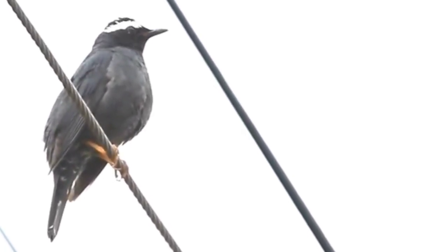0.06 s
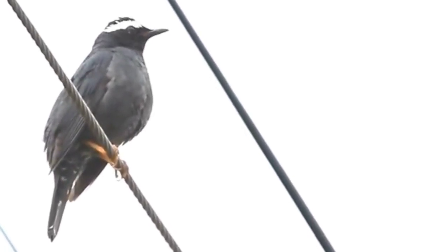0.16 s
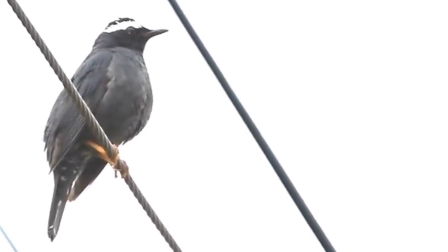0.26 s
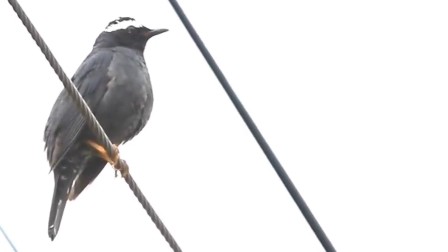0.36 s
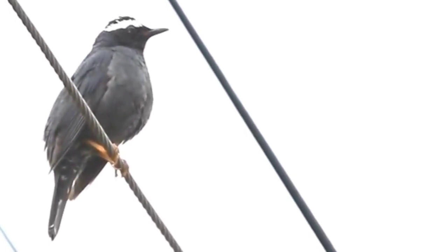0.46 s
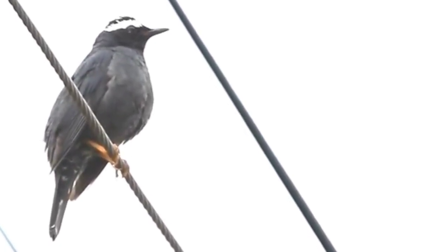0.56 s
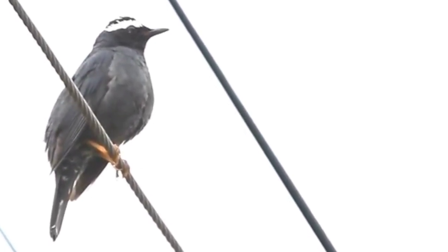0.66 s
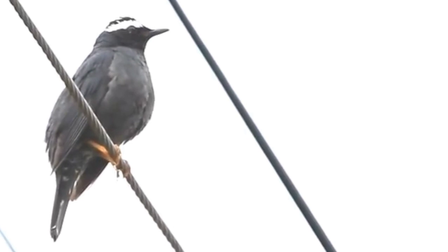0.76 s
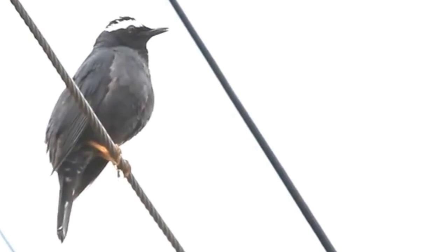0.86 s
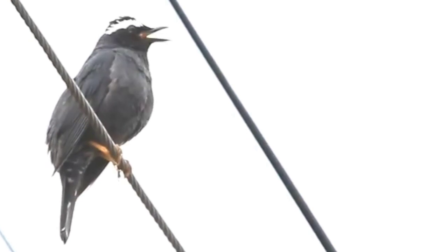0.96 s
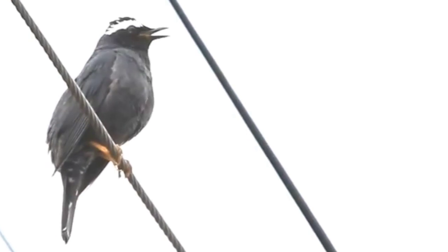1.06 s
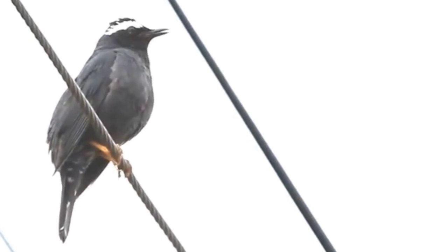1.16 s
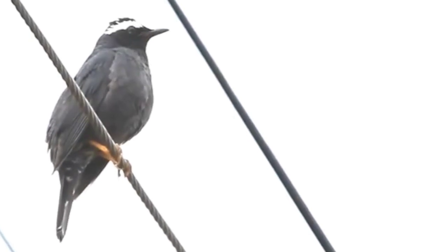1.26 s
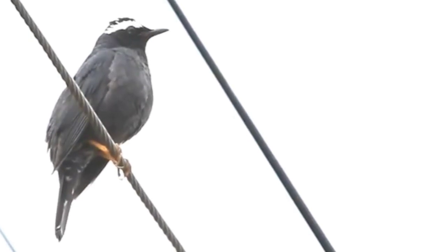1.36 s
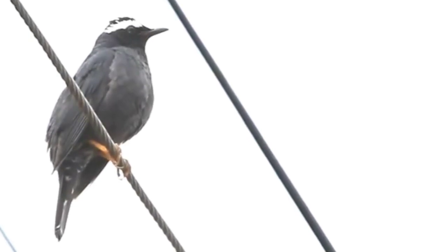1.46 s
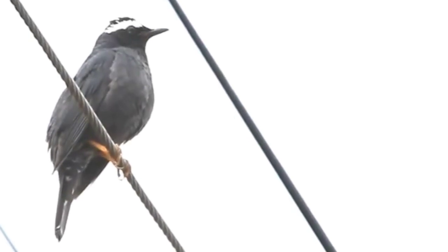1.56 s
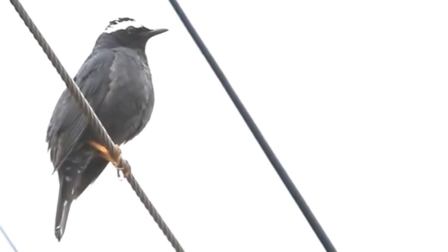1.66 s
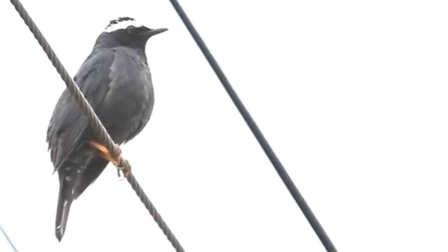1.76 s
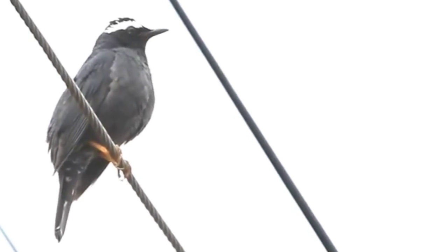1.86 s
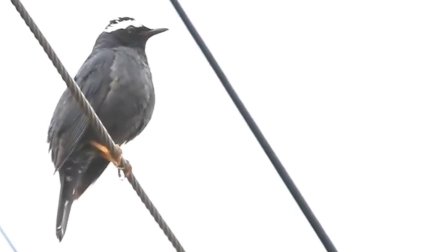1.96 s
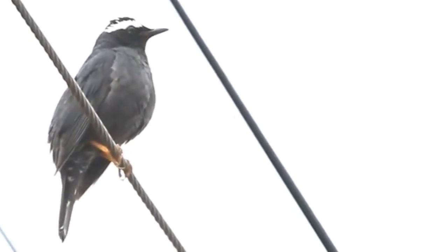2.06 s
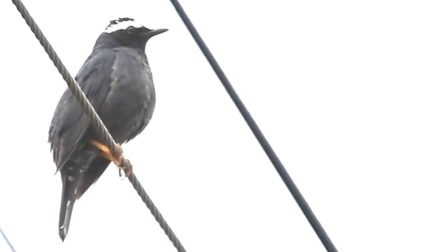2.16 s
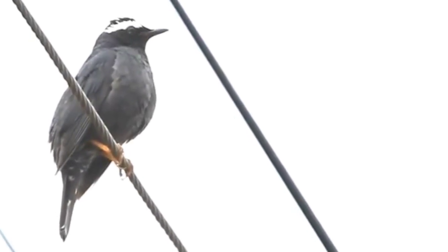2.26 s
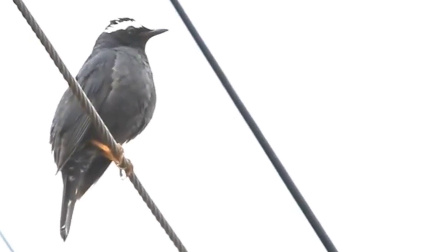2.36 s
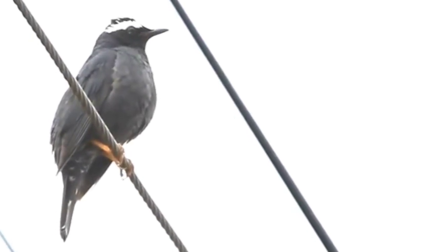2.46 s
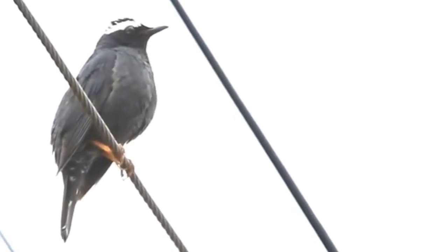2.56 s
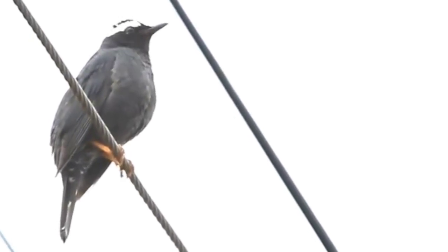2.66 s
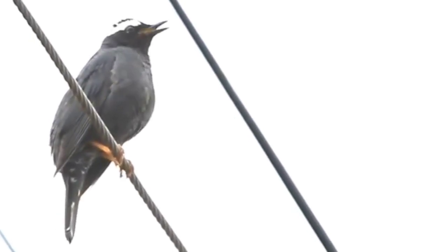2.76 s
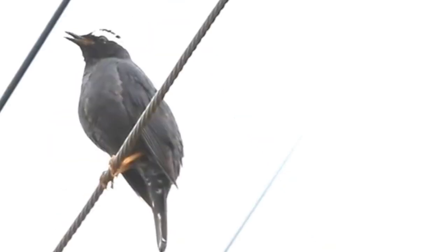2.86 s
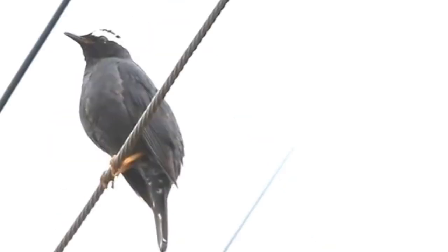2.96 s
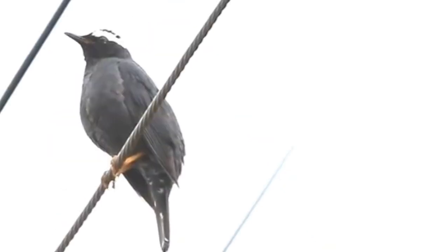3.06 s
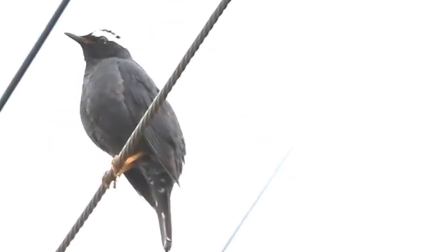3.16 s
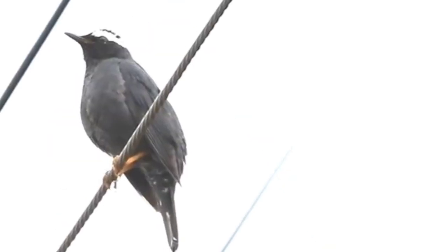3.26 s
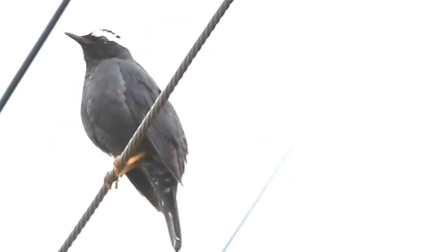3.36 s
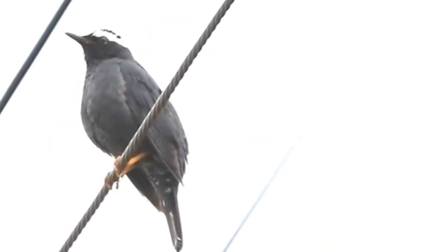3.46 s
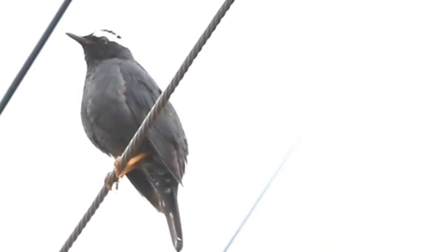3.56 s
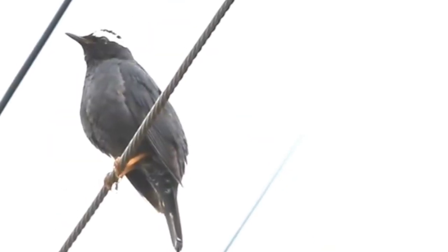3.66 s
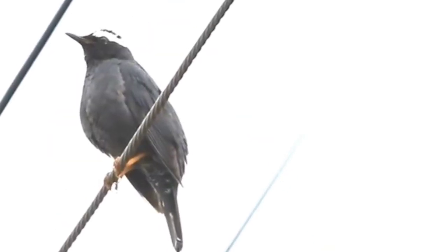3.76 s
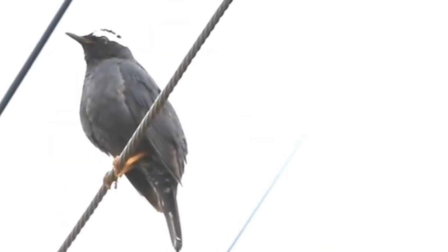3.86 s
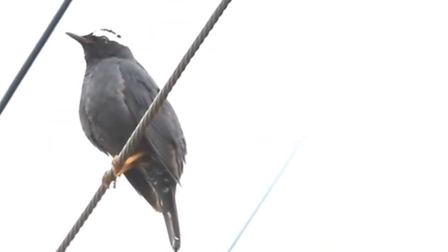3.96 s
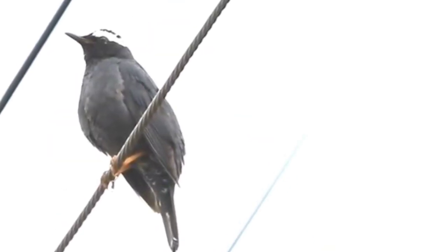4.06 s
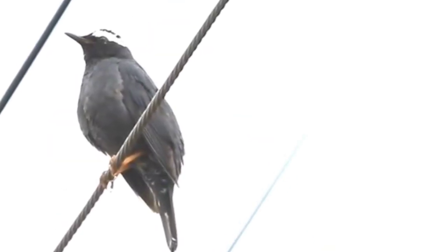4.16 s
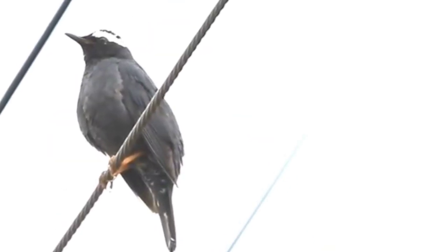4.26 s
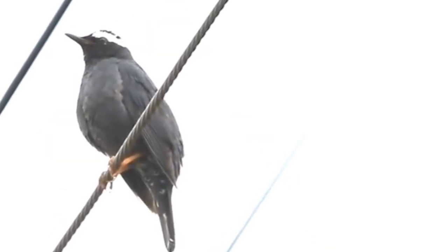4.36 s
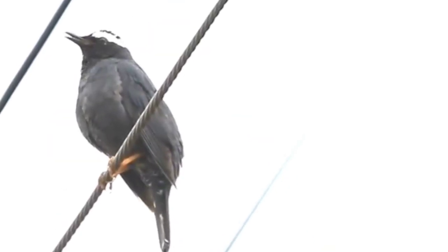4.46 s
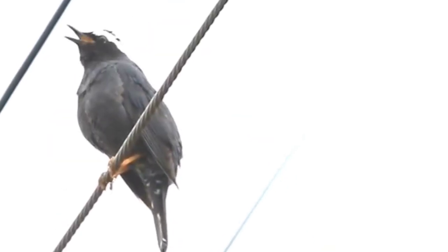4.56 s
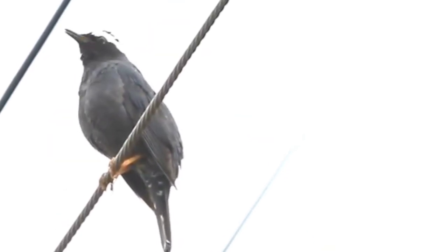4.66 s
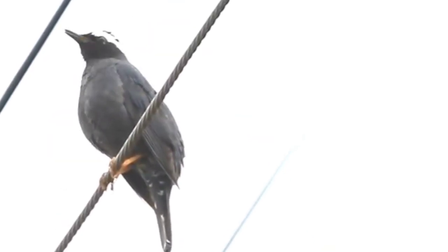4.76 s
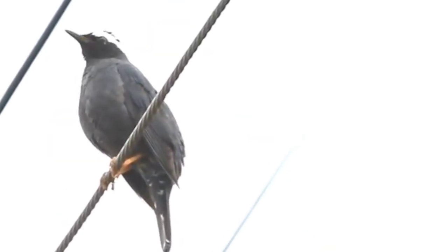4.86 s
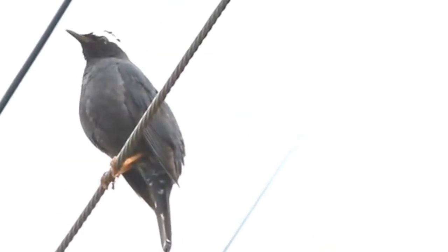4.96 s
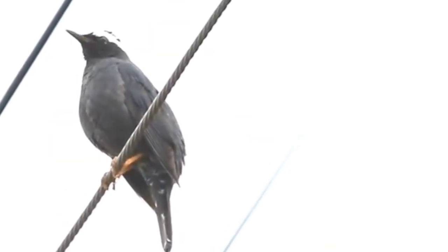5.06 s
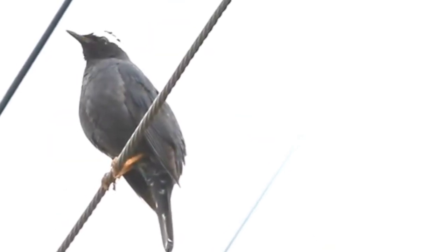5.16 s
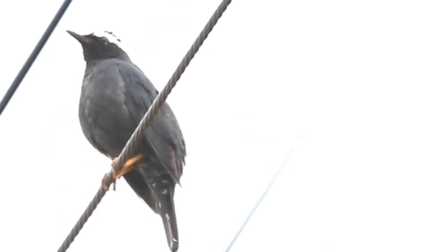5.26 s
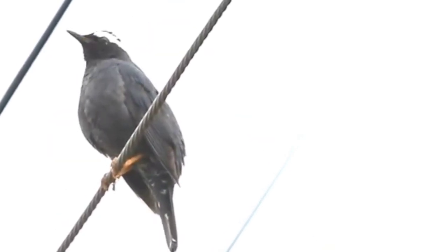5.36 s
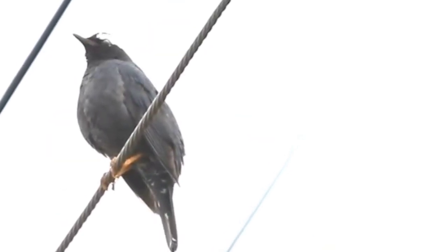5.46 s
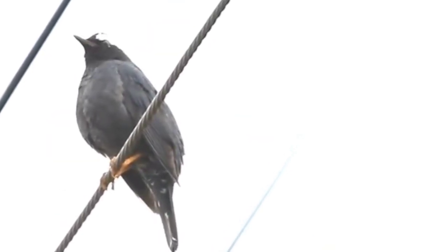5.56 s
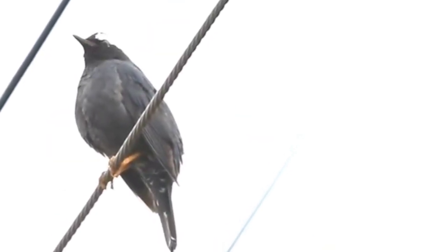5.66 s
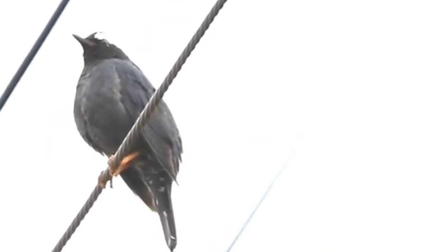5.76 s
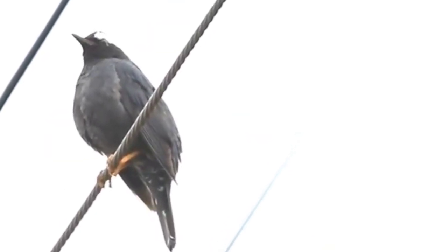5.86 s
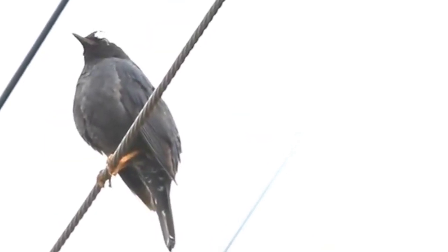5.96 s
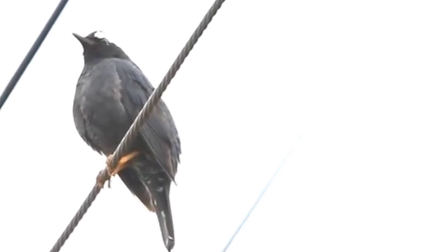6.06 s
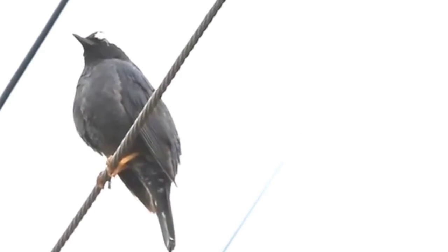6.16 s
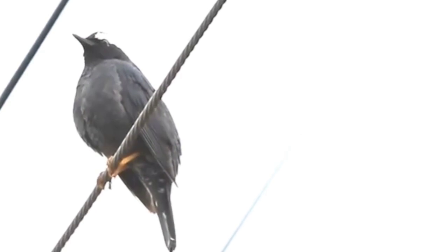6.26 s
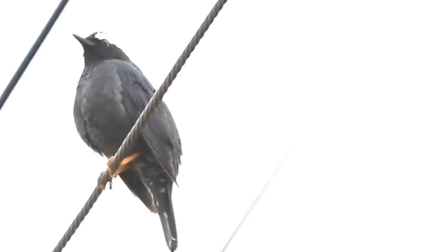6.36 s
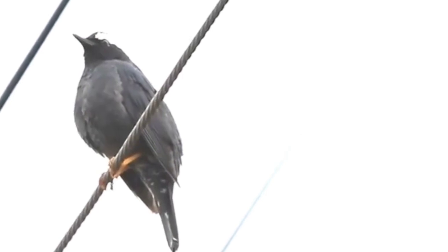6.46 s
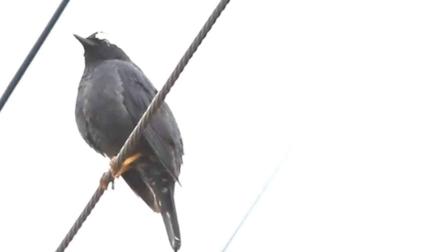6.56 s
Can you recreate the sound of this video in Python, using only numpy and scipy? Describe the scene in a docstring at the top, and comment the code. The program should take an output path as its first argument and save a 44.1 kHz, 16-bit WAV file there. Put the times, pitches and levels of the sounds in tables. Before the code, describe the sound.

Faint hum and hiss with two low distant whistles open the scene. Then a nearby thrush gives a strong fluty phrase, a few thin high notes, a fast fading trill, and finally a fluty sweep ending in squeaks and buzz. Far birds answer in the gaps, and a small one repeats thin calls to the end. Open wooded place, nearly mono sound.

```python
"""A faint hollow hum and hiss come first, then far birds; soon a thrush on a wire sings close by.
The thrush mixes fluty warbles, thin high notes and a trill, while other birds call from the trees around.
Every bird note is a sine wave that glides in pitch and is thrown back by the trees as echoes.
The hum and hiss are random noise, made stronger at some pitches than at others."""
import sys
import numpy as np
from scipy import signal
from scipy.fft import rfft, irfft
from scipy.io import wavfile
from scipy.ndimage import uniform_filter1d

SR = 44100
rng = np.random.default_rng(int(sys.argv[2]) if len(sys.argv) > 2 else 0)


def unload_wav(signal):
    """Save mono or channel-first audio to the path in sys.argv[1] as 16-bit WAV at rate SR, clipped to [-1, 1]."""
    wavfile.write(
        sys.argv[1],
        SR,
        np.round(np.clip(np.atleast_2d(signal).T, -1, 1) * 32767).astype(np.int16),
    )


N = 291942


def gain_of(db):
    """Turns decibels into a factor on the sound wave."""
    return 10 ** (np.asarray(db) / 20)


def evened(x):
    """Scales a signal to an average strength (rms) of 1."""
    return x / np.sqrt(np.mean(x ** 2) + 1e-20)


def read(points, hz):
    """Reads a (pitch_hz, value) table at any pitch, along a logarithmic pitch scale."""
    table_hz, value = np.transpose(points)
    return np.interp(np.log(hz + 1), np.log(table_hz + 1), value)


def add(mix, start_s, sound):
    """Adds a sound into the mix at its start time, cut off at the end of the mix."""
    part = mix[round(start_s * SR):][:len(sound)]
    part += sound[:len(part)]


def wander(length, ms):
    """Smooth chance of rms 1 that changes within about ms."""
    span = max(round(ms * SR / 1000), 2)
    smooth = uniform_filter1d(rng.standard_normal(length), span)
    return evened(uniform_filter1d(smooth, span))


# Hollow resonances in the background: (pitch_hz, width_hz, relative_db)
HUM_RESONANCES = [(59.07, 16, -3.5), (129.4, 35, -11.5), (367.06, 87, -2.5), (637.9, 62, -2),
                  (796.4, 61, 1), (1361, 79, -7), (2683.6, 270, -17.5), (3550, 100, -23)]
# The resonance near 237 Hz changes in strength: (time_s, relative_db)
LOW_HUM_LEVEL = [(0, 0.5), (.5, 5.5), (.9, -3), (3.3, 0.5), (4.0, -7), (6.62, -5.5)]
LOW_HUM_HZ, LOW_HUM_WIDTH_HZ = 237.1, 72


def hum_power(hz, time_s):
    """Hollow hum: power is lifted in a peak around each resonance."""
    low_db = np.interp(time_s, *np.transpose(LOW_HUM_LEVEL))
    resonances = HUM_RESONANCES + [(LOW_HUM_HZ, LOW_HUM_WIDTH_HZ, low_db)]
    return sum(gain_of(2 * db) / (1 + (2 * (hz - centre_hz) / width_hz) ** 2) ** 2
               for centre_hz, width_hz, db in resonances)


# Tone colour of the hiss, before an even lowering: (pitch_hz, relative_db)
HISS_COLOUR = [(20, -31.5), (50, -16.5), (120, -13.5), (250, -9.5), (500, -4.5), (900, -8), (1500, -11.5),
               (2200, -25.5), (3100, -23), (6000, -28), (13200, -36), (14000, -53.5), (15700, -54)]
# Left-right difference (side) against the shared sound (mid), also used by the echoes: (pitch_hz, side_db)
STEREO_WIDTH = [(100, -38.5), (400, -46), (2500, -32), (5000, -24), (10000, -22), (14000, -21.5)]
# Overall background level, before its slow unevenness: (time_s, level_db)
BACKGROUND_LEVEL = [(0.0, -65), (4.6, -65.5), (4.85, -61.5), (5.2, -65), (6.62, -66.5)]
# The background level dips briefly: (centre_s, half_length_s, change_db)
BACKGROUND_DIPS = [(2.53, 0.068, -5), (2.84, 0.0134, -13)]
SWELL_DB, SWELL_MS = 1.3768, 120  # slow unevenness


def background():
    """Noise with a coloured spectrum, lifted at the hum's resonances, in slowly drifting patches."""
    frames, hz = N // 512 + 5, np.fft.rfftfreq(2048, 1 / SR)[:, None]
    a, b, c, d, patches = rng.standard_normal((frames, 1025, 5)).T
    patches = evened(uniform_filter1d(uniform_filter1d(patches, 14, 0), 8, 1))
    hiss = gain_of(2 * read(HISS_COLOUR, hz) - 8.0)  # doubled decibels give power
    power = hiss + hum_power(hz, np.arange(frames) * 512 / SR)
    colour = np.sqrt(power) * gain_of(0.54 * patches)
    side_noise = (c + 1j * d) * gain_of(read(STEREO_WIDTH, hz))
    z = np.array([a + 1j * b, side_noise]) * colour
    mid, side = signal.istft(z, nperseg=2048, noverlap=1536)[1][:, :N]
    t = np.arange(N) / SR
    level_db = np.interp(t, *np.transpose(BACKGROUND_LEVEL)) + SWELL_DB * wander(N, SWELL_MS)
    for centre_s, half_s, change_db in BACKGROUND_DIPS:
        level_db = level_db + change_db * np.exp(-((t - centre_s) / half_s) ** 2)
    return gain_of(level_db) * evened(np.array([mid + side, mid - side]))


# Basic time to die by 60 dB, before each echo's own speed and thinning: (pitch_hz, time_s)
ECHO_TIMES = [(1600, 0.36), (2000, 0.7), (2400, 0.7945), (2700, 0.32), (3000, 0.44), (3600, 0.53),
              (4500, 0.53), (6000, 0.65), (7300, 0.42), (9000, 0.43), (12000, 0.15)]
# Pitches the trees return more or less strongly: (pitch_hz, change_db)
ECHO_COLOUR = [(1500, 6), (2000, -4.5), (2400, -2), (2700, 2), (3000, 1), (4000, -2), (6000, -1),
               (9000, -0.5)]
# Clumps of trees answer more strongly or weakly: (delay_s, change_db)
THICKETS = [(.03, 2.5), (.058, -5.5), (.105, 2.5), (.16, -2)]


def echoes(x, delay_s, quicker, thinning_db, patchy_db):
    """Sparse taps from trunks and leaves, uneven in time and pitch; each band dies at its own speed, ever faster."""
    taps = np.zeros((2, SR))
    at = np.arange(round(delay_s * SR), SR - 80, 60)
    at = at + rng.integers(0, 60, (2, len(at)))
    np.put_along_axis(taps, at, rng.standard_normal(at.shape), 1)
    hz, t, z = signal.stft(taps, SR, nperseg=256)
    patches = rng.standard_normal(z.shape[1:])
    patches = evened(uniform_filter1d(uniform_filter1d(patches, size=3, axis=0), size=6, axis=1))
    fade = quicker * t / read(ECHO_TIMES, hz)[:, None]
    clumps_db = sum(db * np.exp(-((t - s) / 0.003) ** 2) for s, db in THICKETS)
    thinning = np.minimum(thinning_db * fade ** 2, 200)
    db = -60 * fade - thinning + clumps_db + patchy_db * patches
    z = z * gain_of(db + read(ECHO_COLOUR, hz)[:, None])
    z[1] *= gain_of(read(STEREO_WIDTH, hz) + 3.5)[:, None]  # wider than the background
    mid, side = signal.istft(z, SR, nperseg=256)[1]
    left_right = np.array([mid + side, mid - side]) / np.linalg.norm(mid)
    return signal.fftconvolve(x[None], left_right, axes=1)[:, :N]


OCTAVE_HZ, OCTAVE_WIDTH_HZ, OCTAVE_DB = 4900, 197, -42  # a throat resonance


def whistle(hz, db, waver, flutter_db, octave=False):
    """A sine from the syrinx, unsteady in pitch and strength; an octave sounds only near the throat resonance."""
    turns = 2 * np.pi * np.cumsum(hz * (1 + waver * wander(len(hz), 2.56))) / SR
    tone = np.sin(turns)
    if octave:
        resonance = 1 / (1 + (2 * (2 * hz - OCTAVE_HZ) / OCTAVE_WIDTH_HZ) ** 4)
        tone = tone + gain_of(OCTAVE_DB) * np.sin(2 * turns) * resonance
    strength = gain_of(db + flutter_db * wander(len(hz), 3.5))
    soft_ends = signal.windows.tukey(len(hz), min(1, .012 * SR / len(hz)))
    return np.sqrt(2) * strength * tone * soft_ends


def notes(tables, waver, flutter_db, octave=False):
    """Plays each (time_s, pitch_hz, level_db) curve as one whistle with rounded corners."""
    out = np.zeros(N)
    for rows in tables:
        s, hz, db = np.transpose(rows)
        t = np.arange(s[0], s[-1], 1 / SR)
        hz = uniform_filter1d(np.interp(t, s, hz), size=130)
        db = uniform_filter1d(np.interp(t, s, db), size=130)
        add(out, s[0], whistle(hz, db, waver, flutter_db, octave))
    return out


EDGE_CURVE = 1.7  # above 1 the note lingers near its peak


def shaped(rows, swell_db, fade_db):
    """Makes note curves that swell to a peak and fade while the pitch glides through three values."""
    u, tables = np.linspace(0, 1, num=25), []
    for start_s, length_s, place, first_hz, peak_hz, last_hz, peak_db in rows:
        place = np.clip(place, .05, .95)
        rise = np.maximum(1 - u / place, 0)
        fall = np.maximum((u - place) / (1 - place), 0)
        db = peak_db - swell_db * rise ** EDGE_CURVE - fade_db * fall ** EDGE_CURVE
        hz = np.interp(u, [0, place, 1], [first_hz, peak_hz, last_hz])
        tables.append(np.transpose([start_s + length_s * u, hz, db]))
    return tables


def warble(rows, per_s, start, narrow, dip_db, slide_db, flutter_db, slowing=0):
    """A whistle whose pitch dips once a cycle; narrow makes dips briefer, dip_db louder; slide_db weakens slides."""
    s, *columns = np.transpose(rows)
    t = np.arange(s[0], s[-1], 1 / SR)
    top_hz, dip_hz, db = (np.interp(t, s, c) for c in columns)
    since = t - s[0]
    cycles = start + since * per_s - slowing * since ** 2 / 2
    dip = abs(np.cos(np.pi * cycles)) ** narrow  # 0 at the top pitch, 1 at the lowest
    level_db = db + dip_db * dip - slide_db * dip * (1 - dip)
    out = np.zeros(N)
    add(out, s[0], whistle(top_hz - dip_hz * dip, level_db, .004, flutter_db))
    return out


# Single notes of birds farther off: (start_s, length_s, peak_place 0-1, first_hz, peak_hz, last_hz, peak_db)
DISTANT_NOTES = [(.283, 0.0837, .3, 2130, 2000, 1937, -47.5), (.35, 0.0973, .35, 2100, 2054, 1928, -50.5),
                 (1.832, 0.0708, 0.233, 2482, 2393, 2300, -63), (3.41, 0.096, .5, 8090, 8520, 8520, -81),
                 (3.578, 0.1, 0.22, 4466, 4472, 4553, -43), (3.7, 0.23, 0.41, 4504, 4560, 4600, -57),
                 (3.625, 0.045, 0.33, 3724, 3840, 3645, -55.5),
                 (3.698, 0.0196, 0.44, 7000, 6930, 6950, -54), (3.718, 0.0244, .3, 6550, 6516, 6430, -58.5),
                 (3.742, 0.0517, 0.41, 3259, 3230, 3610, -46), (3.785, 0.196, 0.64, 3585, 3783, 3820, -48),
                 (3.81, 0.173, 0.3, 4690, 4830, 4830, -54.5), (4.048, 0.063, .45, 6540, 6076, 5790, -44),
                 (4.19, 0.0488, 0.33, 6470, 6290, 5870, -42.5), (4.305, 0.16, .3, 7600, 7730, 7730, -68.5),
                 (4.428, 0.034, .55, 3900, 3403, 3363, -49), (4.45, 0.187, .45, 3284, 3251, 3297, -48),
                 (6.435, .065, 0.281, 5004, 5015, 4950, -67)]


def distant_notes():
    """Far birds give single gliding whistles."""
    return notes(shaped(DISTANT_NOTES, swell_db=15, fade_db=9.84), 0.0035, 3.3)


def repeats(shape, times):
    """The same call at each time, with the pitch scaled and the level shifted."""
    return [[(s + at, hz * pitch, db + level) for s, hz, db in shape] for at, level, pitch in times]


# Shapes of a small distant bird's two calls, before scaling: (from_start_s, pitch_hz, relative_db)
RISING_SHAPE = [(0, 3451, -24.5), (.016, 3578.5, -2.5), (.03, 3849.5, -11), (.047, 4268, 0.5),
                (.095, 4240.5, -12)]
FALLING_SHAPE = [(0, 6930, -32.5), (.014, 7273, -9), (.023, 7476, -4), (.031, 6711, 1), (.055, 7150, -1.5),
                 (.075, 7089, -18)]
# When each call comes: (start_s, level_db, pitch_factor)
RISING_TIMES = [(1.641, -73, 0.992), (1.99, -75, 0.957), (2.34, -70.5, 0.97), (4.45, -66.5, 0.998),
                (5.135, -50, 0.99), (5.484, -53.5, 1), (5.835, -58, 0.974), (6.184, -50, 1.0),
                (6.531, -51, 0.956)]
FALLING_TIMES = [(2.157, -74.5, 0.973), (2.506, -54.5, 0.963), (5.3, -51, 0.991), (5.655, -53.5, 0.9978),
                 (5.997, -51.5, 1.0), (6.348, -49, 0.9965)]


def two_call_bird():
    """A small distant bird repeats two whistled calls, at times in turn."""
    calls = repeats(RISING_SHAPE, RISING_TIMES) + repeats(FALLING_SHAPE, FALLING_TIMES)
    return notes(calls, .004, 3.5)


# Tone colour of the hiss around strong whistles: (pitch_hz, relative_db)
SPRAY_COLOUR = [(100, -12), (1000, -6), (3500, 8.5), (5000, -16.5), (9000, -23), (13000, -27)]


def spray(x):
    """A faint hiss, wide in pitch, spreads round the strongest whistles, growing faster than they do."""
    hz = np.fft.rfftfreq(N, 1 / SR)
    noise = rfft(rng.standard_normal(N))
    hiss = evened(irfft(noise * gain_of(read(SPRAY_COLOUR, hz)), N))
    return gain_of(-32.0) * hiss * abs(uniform_filter1d(x ** 2, size=500)) ** 0.66


# The thrush's faint rough squeaks at the very top:
# (start_s, length_s, peak_place 0-1, first_hz, peak_hz, last_hz, peak_db)
SQUEAK_NOTES = [(1.06, 0.0673, .7, 11750, 11360, 11420, -54), (1.112, 0.0705, .3, 11430, 11390, 11560, -54),
                (1.042, .032, 0.4894, 13900, 13900, 13850, -71),
                (1.218, 0.044, 0.25, 10800, 11160, 11290, -61),
                (2.965, 0.0426, 0.5152, 11550, 11490, 11460, -59.5),
                (2.965, 0.03108, 0.94, 14000, 13900, 13900, -67.5),
                (2.97, 0.02977, .4, 12400, 12900, 12400, -57.5),
                (2.985, .025, .4, 11400, 10550, 9700, -64.5),
                (4.64, .062, 0.57, 11500, 11500, 12400, -55.5),
                (4.705, 0.0853, 0.5, 10650, 11460, 11600, -54.5),
                (4.65, 0.0754, .55, 10000, 9830, 9700, -60), (4.705, 0.0351, .6, 9700, 10110, 10200, -44),
                (4.733, .04, .6, 10900, 9926, 9800, -44), (4.775, 0.041, .45, 10300, 10090, 9900, -45),
                (4.655, .05, .6, 10420, 10700, 10600, -59.5),
                (4.665, 0.0276, 0.49, 12400, 12500, 12010, -64),
                (4.695, 0.064, .25, 12000, 12070, 12590, -50)]


def squeaks():
    """Very high whistles, roughened by a strong waver in pitch."""
    return notes(shaped(SQUEAK_NOTES, swell_db=18, fade_db=18), 0.015, 3.3)


# A very fast warble: (time_s, top_hz, dip_depth_hz, level_db at the top)
BUZZ_CURVE = [(4.934, 7700, 100, -64), (4.975, 7500, 1800, -41), (4.998, 7150, 2700, -41),
              (5.012, 6400, 1800, -52)]


def buzz():
    """The pitch dips so often that the whistle buzzes."""
    return warble(BUZZ_CURVE, per_s=110, start=.41, narrow=1.5, dip_db=4.0, slide_db=4.0, flutter_db=3.0)


# A fast warble with brief dips: (time_s, top_hz, dip_depth_hz, level_db at the top)
STUTTER_CURVE = [(4.778, 5620, 102, -60.5), (4.81, 5361, 1159, -39), (4.85, 5293, 600, -57)]


def stutter():
    """A whistle broken up by quick, brief pitch dips that are weaker than the top."""
    return warble(STUTTER_CURVE, per_s=66, start=.8, narrow=5.1, dip_db=-6.5, slide_db=4.0, flutter_db=5.6)


TRILL_SLOWING = 30  # cycles a second lost each second, in chatter and trill
# Short pips under the trill: (top_hz, starting_level_db, length_s)
CHATTER_PIPS = [(2769.3, -54.5, 0.077), (3393, -51, 0.1043), (4063, -52, 0.11), (4506, -56, 0.12)]
CHATTER_START_S, CHATTER_FADE_DB, CHATTER_DIP_HZ = 2.984, 20.5, 360.8


def chatter():
    """A few pitches at once, pulsing under the trill and dying away."""
    out = np.zeros(N)
    for hz, db, length_s in CHATTER_PIPS:
        rows = [(CHATTER_START_S, hz, CHATTER_DIP_HZ, db),
                (CHATTER_START_S + length_s, hz, CHATTER_DIP_HZ, db - CHATTER_FADE_DB)]
        out += warble(rows, per_s=41, start=.7, narrow=2.1, dip_db=12.83, slide_db=1.5,
                      flutter_db=6.08, slowing=TRILL_SLOWING)
    return out


# The trill dips from a top pitch and returns: (time_s, top_hz, dip_depth_hz, level_db at the top)
TRILL_CURVE = [(2.991, 5376, 646.2, -26.5), (3.1, 5384, 549.5, -39), (3.29, 5378, 400, -55),
               (3.345, 5310, 385, -71.5)]


def trill():
    """A whistle dips in pitch many times a second, slowing as it fades."""
    return warble(TRILL_CURVE, per_s=36.5, start=.9, narrow=1.8, dip_db=-2.0, slide_db=8.3,
                  flutter_db=1.8, slowing=TRILL_SLOWING)


# The thrush's thinner notes and sweeps:
# (start_s, length_s, peak_place 0-1, first_hz, peak_hz, last_hz, peak_db)
THIN_NOTES = [(1.798, 0.0469, 0.4, 7380, 7370, 7302, -44.5), (1.826, 0.0745, 0.27, 7420, 7382, 7214, -32),
              (1.978, 0.0695, 0.44, 7359, 7414, 7227, -38.5),
              (2.125, 0.0677, 0.39, 7305, 7419, 7278, -45.5), (2.875, .06, 0.36, 4570, 4560, 4600, -75),
              (2.885, .068, 0.65, 3560, 3620, 3550, -50), (2.918, 0.0295, 0.8, 5950, 6180, 5980, -41.5),
              (2.95, 0.0379, 0.63, 9100, 6750, 6136, -26.5), (2.983, 0.017, 0.4, 6200, 4998, 4750, -23),
              (2.97, 0.0237, 0.58, 3670, 4210, 3000, -29.5), (4.6, .085, 0.52, 6900, 7030, 7100, -58),
              (4.695, .042, 0.3, 7140, 7400, 7260, -59), (4.745, .075, 0.5, 7940, 7980, 7900, -68.5),
              (4.775, .047, 0.54, 3280, 3320, 3100, -52), (4.928, 0.0212, 0.17, 3423, 3223, 2868, -42.5),
              (4.955, .017, 0.47, 3180, 3340, 3304, -50.5), (4.931, .018, 0.44, 5000, 4730, 4800, -52),
              (4.934, .013, 0.5, 5900, 6164, 6150, -50)]


def thin_notes():
    """Short gliding whistles, most of them high, that swell and fade."""
    return notes(shaped(THIN_NOTES, swell_db=20, fade_db=12), .004, 2.5)


# The thrush's strong low whistles, one curve a note: (time_s, pitch_hz, level_db)
FLUTY_NOTES = [
    [(1.0, 1997, -78.5), (1.03, 1996, -37.5), (1.06, 1974, -30), (1.074, 1940, -24.5), (1.082, 1930, -34)],
    [(1.09, 1880, -29.5), (1.1, 2069, -26.5), (1.112, 2638, -19.5), (1.13, 2929, -16.5), (1.148, 2967, -13),
     (1.16, 2411, -23.5), (1.172, 2399, -24.5), (1.196, 2367, -24.5), (1.224, 2723, -25),
     (1.25, 2942, -21.5), (1.262, 2378, -36.5), (1.3, 2205, -41)],
    [(4.62, 2390, -67.5), (4.632, 2408, -34), (4.642, 2450, -56.5)],
    [(4.638, 1614, -40), (4.656, 1746, -25.5), (4.68, 2087, -23), (4.7, 2370, -14), (4.718, 2557, -14),
     (4.745, 2102, -17), (4.776, 1779, -27.5), (4.815, 1595, -26)],
]


def fluty_notes():
    """Strong low whistles with a faint octave where the throat resonates."""
    return notes(FLUTY_NOTES, .003, .9, octave=True)


def scene():
    """The thrush and the far birds, each with its echoes, over the background."""
    calls = two_call_bird()
    far = distant_notes() + calls
    far_echoes = echoes(gain_of(-7.0) * far + 0.31 * calls, 0.0044, 1.85, 40, 3.93)

    high, buzzing, rattles = squeaks(), buzz(), chatter() + stutter()
    trilling, thin, fluty = trill(), thin_notes(), fluty_notes()
    thrush = fluty + thin + high + trilling + buzzing + rattles + spray(fluty)
    # the low whistles have longer echoes; those of the thrush's other notes die sooner
    long_echoes = gain_of(-6.5) * echoes(fluty, 0.0044, 0.9488, 60, 3.0)
    sent = gain_of(-4.5) * thin + gain_of(-5.5) * high + gain_of(-6.5) * trilling
    sent = sent + gain_of(3.5) * buzzing + gain_of(-6) * rattles
    short_echoes = echoes(sent, 0.0027, 1.34, 60.03, 4.1)
    return background() + far + far_echoes + thrush + long_echoes + short_echoes


EDGE_HZ = 15700


def record(dry):
    """A low-pass filter removes the sound above the band limit."""
    low_pass = signal.firwin(511, EDGE_HZ, window=("kaiser", 9), fs=SR)
    return signal.oaconvolve(dry, low_pass[None], "same")


dry = scene()
out = record(dry)
unload_wav(out)
```